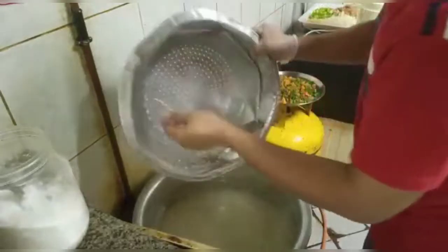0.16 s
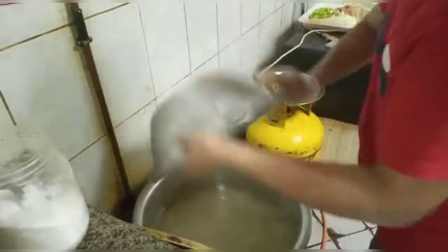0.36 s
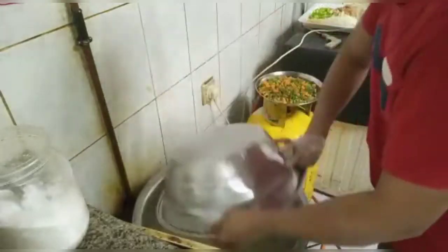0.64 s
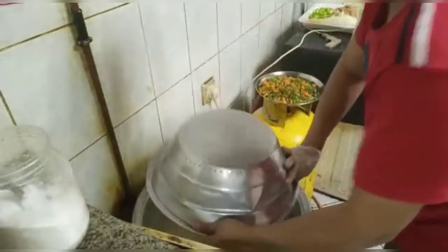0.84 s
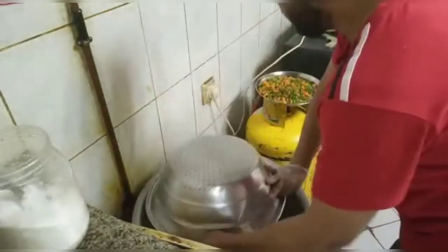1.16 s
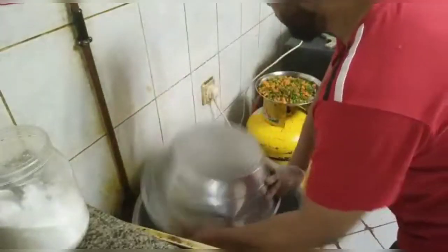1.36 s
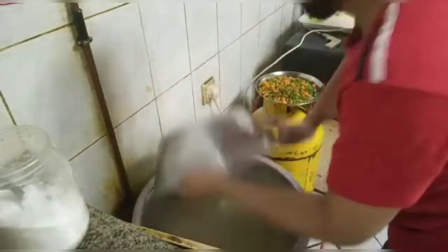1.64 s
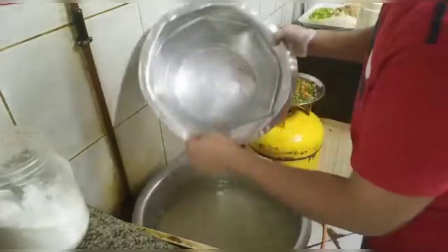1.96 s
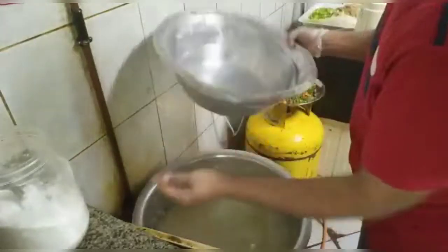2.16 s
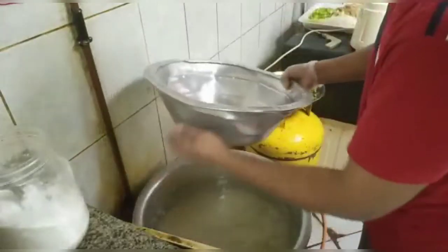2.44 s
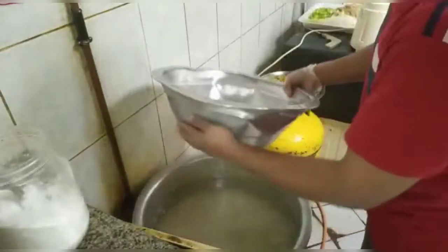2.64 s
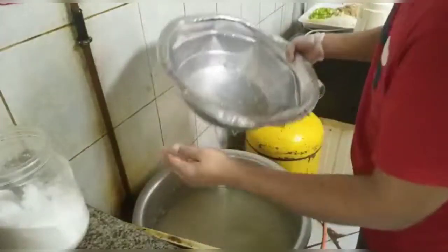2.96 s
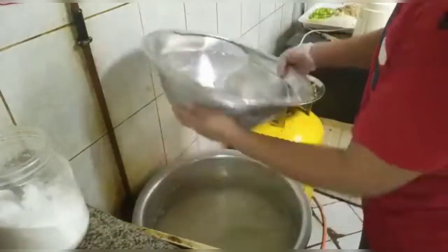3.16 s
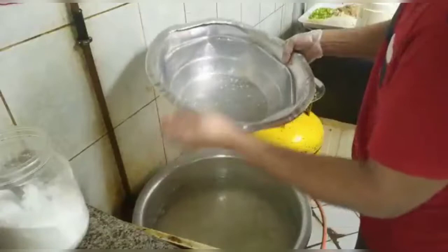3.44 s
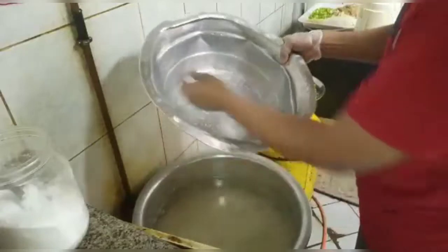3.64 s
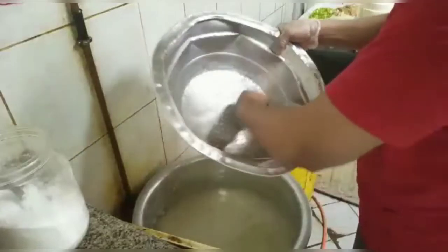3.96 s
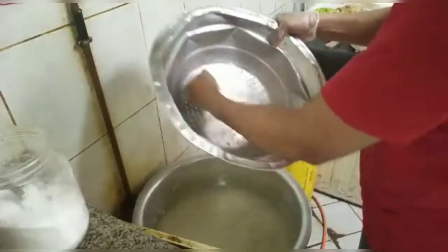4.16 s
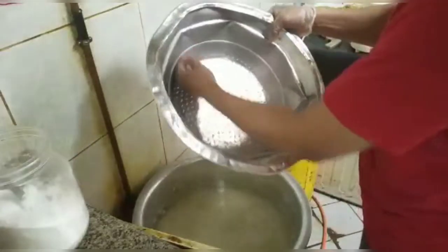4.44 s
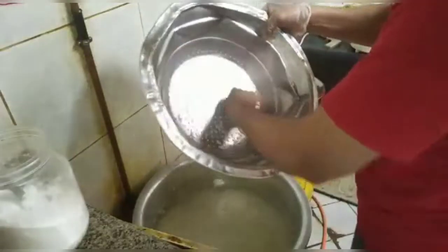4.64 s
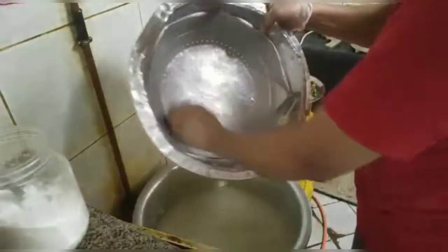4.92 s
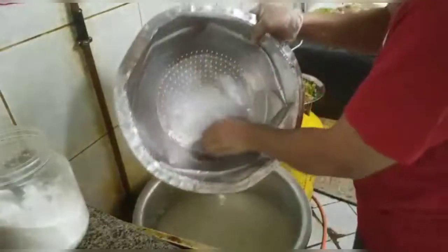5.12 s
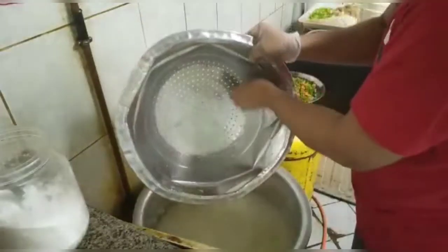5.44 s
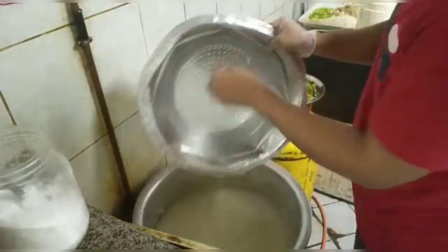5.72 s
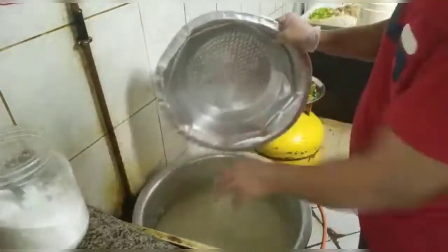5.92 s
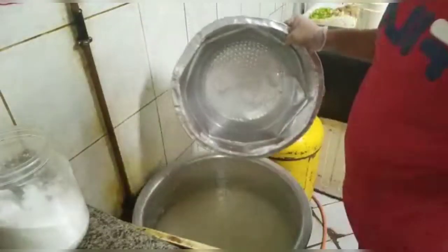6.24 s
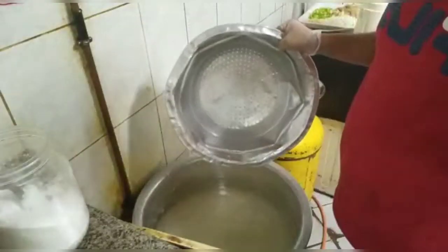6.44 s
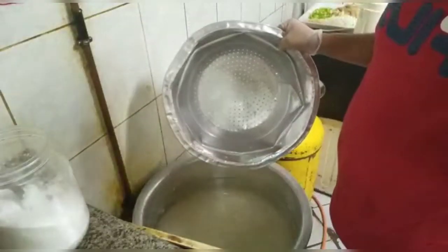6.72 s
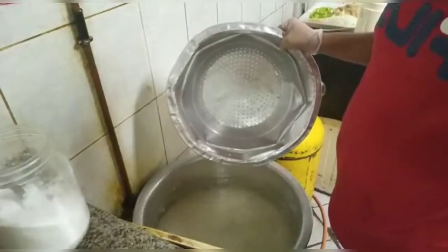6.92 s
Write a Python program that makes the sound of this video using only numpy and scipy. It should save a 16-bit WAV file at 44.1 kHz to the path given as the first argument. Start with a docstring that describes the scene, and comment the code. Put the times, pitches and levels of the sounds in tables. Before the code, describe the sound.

An extractor fan runs throughout in a small tiled kitchen, with a low hum, a faint wavering whine and rushing air. Close to the stereo microphone, a gloved hand softly wipes a thin metal strainer at the start and again around 1 second, with a couple of faint taps. At about 1.4 and 1.7 seconds the strainer is knocked on the rim of a big pot; both ring briefly, and the second clang is much louder. Three hand slaps land at about 2.6, 2.9 and 3.5 seconds, shaking the perforated sheet and rattling the loose rim, with hissy wipes between them. The blows echo briefly, and the background dips after the loud ones and creeps back. From about 3.8 to 5.3 seconds the glove rubs and lightly taps the metal. Faint wipes and a last small skid near 6.3 seconds leave only the fan until about 7 seconds.

```python
"""A small tiled kitchen, with a four-blade extractor fan humming, whining and rushing behind everything.
Close to a stereo microphone, a thin metal strainer is knocked twice on the rim of a big pot and slapped
three times by hand: strainer and pot ring, the perforated sheet shakes and the loose rim rattles.
A gloved hand wipes and taps the metal, softly before the blows and more busily after them.
The recorder's gain control ducks after loud blows and creeps back."""
import sys
import numpy as np
from scipy import signal
from scipy.fft import rfft, irfft, next_fast_len
from scipy.io import wavfile
from scipy.ndimage import uniform_filter1d, minimum_filter1d

SR = 44100
rng = np.random.default_rng(int(sys.argv[2]) if len(sys.argv) > 2 else 0)


def file_out(sig):
    """Save sig as 16-bit WAV at sys.argv[1]."""
    # one column per channel
    cols = np.atleast_2d(sig).T
    # limit, then scale
    lim = np.clip(cols, -1, 1)
    pcm = np.round(lim * 32767).astype(np.int16)
    wavfile.write(sys.argv[1], SR, pcm)


N = 312669

# finger taps: (time [s], strength [dB], extra bass [dB], pitch the struck spot favours [Hz],
# its lift [dB], rattle length [s], level of the glove's skid [dB])
FINGER_TAPS = [(0.813, -43.5, 1, 6000, 11, 0.0098, -39), (1.174, -35, -8, 577, 8.7, 0.019, -39),
               (4.055, -28.5, -15, 1500, 3.3, 0.0076, -33), (4.473, -22, 7, 540, 6.6, 0.019, -23.5),
               (4.799, -35.5, -5, 2110, 12, 0.017, -35), (5.148, -22.5, 2, 603, 4, 0.012, -28),
               (5.246, -33.5, -1, 3000, 13, 0.0096, -34), (6.26, -39, -7, 5070, 12, 0.015, -23)]


def from_db(db):
    """Gain of a dB value."""
    return 10 ** (np.asarray(db) / 20)


def unit_rms(x):
    """Scaled to rms 1."""
    return x / np.sqrt(np.mean(x ** 2) + 1e-20)


def at_hz(table, hz, column=1):
    """A column of a table read on a log-frequency axis."""
    table = np.array(table)
    return np.interp(np.log(hz), np.log(table[:, 0]), table[:, column])


def drift(rate_hz):
    """Slow random wander of rms 1."""
    pole = np.exp(-80 * np.pi * rate_hz / SR)
    slow = signal.lfilter([1], [1, -2 * pole, pole * pole], rng.standard_normal(N // 40 + 2002))[2000:]
    return np.interp(np.arange(N) / 40, np.arange(len(slow)), unit_rms(slow))


def widen(mid, side, hz):
    """Left and right from two unrelated signals, as alike as the microphone's ports hear that pitch."""
    # (frequency [Hz], left-right likeness [-1 to 1])
    likeness = [(30, 0.52), (60, 0.97), (90, 1), (150, 0.96), (300, 0.99), (600, 0.2), (1200, -0.31),
                (3000, 0.11), (12000, -0.07)]
    alike = np.clip(at_hz(likeness, hz), -1, 1)
    mid, side = np.sqrt(1 + alike) * mid, np.sqrt(1 - alike) * side
    return np.array([mid + side, mid - side]) / np.sqrt(2)


def stereo_bands(edges, noise):
    """Yields (centre in Hz, stereo band); neighbouring bands come from different noise pairs."""
    for k, (low, high) in enumerate(zip(edges, edges[1:])):
        bandpass = signal.butter(2, [low, high], "band", fs=SR, output="sos")
        hz = np.sqrt(low * high)
        yield hz, widen(*signal.sosfilt(bandpass, noise[k % 2]), hz)


def banded_noise(spectrum, noise, flicker_db):
    """Half-octave bands of stereo noise, each with its own level and flicker; rms 1."""
    bands = stereo_bands(25 * 2 ** np.arange(0, 9.6, .5), noise)
    return unit_rms(sum(from_db(at_hz(spectrum, hz) + flicker_db * drift(33)) * band for hz, band in bands))


def fan_air():
    """Rushing air, lifted at the resonances of the fan housing."""
    # air spectrum: (frequency [Hz], relative density [dB])
    spectrum = [(20, 1), (45, -22.5), (90, -1.5), (130, -15), (250, -18.5), (400, -20.5), (620, -22.5),
                (1100, -29), (1470, -23), (1900, -26.5), (3000, -25), (6700, -38.5), (8200, -24.5),
                (13000, -27.5), (20000, -31)]
    # housing resonances: (frequency [Hz], width [Hz], level [dB])
    housing = [(1094, 153, 9), (1767, 140, 4.5)]
    white = rng.standard_normal((2, 2, N))
    resonance = sum(from_db(level_db) * signal.lfilter(*signal.iirpeak(hz, hz / width_hz, SR), white)
                    for hz, width_hz, level_db in housing)
    return from_db(-33) * banded_noise(spectrum, white + resonance, flicker_db=1.0)


def fan(shaft_hz=24.24, whine_multiple=44.04):
    """Blade and motor tones that waver with turbulence, over rushing air."""
    # (multiple of the shaft rate, base level [dB], wavering [dB])
    tones = [(4, -24, 2.2), (5, -45, 3.0), (8, -38, 1.5), (11, -49, 3.0), (12, -38, 1.5), (16, -40, 1.5),
             (24, -55, 3.0), (3, -36, 3), (43, -54, 2), (44.04, -36.8, 2.6), (45, -52, 2), (46, -51, 2),
             (49, -54, 2), (54, -56, 2), (71.4, -54, 2), (72.4, -46, 2), (75.4, -57, 2), (78.3, -55, 2),
             (79.25, -51, 2)]
    # slow rise and fall in heard level, the hum's from the fan and the recorder's gain together:
    # (time [s], hum [dB], whine [dB])
    heard_levels = [(0, -3.5, -4.5), (1, -4, -7.5), (1.5, -4, -2), (2.3, -6.5, -7), (3.2, -1, -1.5),
                    (3.999, -1.5, -0.5), (4.498, -6, -0.5), (5.399, -1, -8), (5.698, -3.5, 4), (6.1, -2, 6),
                    (6.25, -2, -4.5), (6.5, -2, 5.5), (6.8, -1.5, -6), (7.09, -4, 0)]
    times, hum_db, whine_db = np.transpose(heard_levels)
    turns = np.cumsum(shaft_hz * (1 + 0.00076 * drift(1.2))) / SR
    out = fan_air()
    for multiple, level_db, waver_db in tones:
        phase = 2 * np.pi * (multiple * turns + rng.random())
        heard_db = np.interp(np.arange(N) / SR, times, whine_db if multiple == whine_multiple else hum_db)
        gain = np.sqrt(2) * from_db(level_db + heard_db + waver_db * np.minimum(drift(7.7), 1))
        out += gain * widen(np.sin(phase), np.cos(phase), multiple * shaft_hz)
    return out


def kitchen_echoes(x, t60_s=0.51, wall_cut_hz=4630):
    """Eight echo paths a side between tiled walls, duller on every round."""
    size = next_fast_len(N + SR)
    omega = 2 * np.pi * np.arange(size // 2 + 1) / size
    dull = 1 / (1 + 1j * omega * SR / (2 * np.pi * wall_cut_hz))
    echoes = np.zeros((2, len(omega)), complex)
    for k, lag in enumerate(rng.uniform(.009, .034, 16) * SR):
        loop = from_db(-60 * lag / SR / t60_s) * dull * np.exp(-1j * omega * lag)
        echoes[k % 2] += (-1) ** (k // 2) * loop / (1 - loop)
    return irfft(rfft(x, size) * echoes, size)[:, :N]


def dense_modes(length, peaky_db=3.5, peak_width_hz=50):
    """Two pairs of noises for the sheet's dense modes, bunched into narrow peaks at chance pitches."""
    spectrum = rfft(rng.standard_normal((2, 2, length)))
    width = max(int(peak_width_hz * length / SR), 1)
    peaks = uniform_filter1d(uniform_filter1d(rng.standard_normal(spectrum.shape[-1]), width), width)
    return irfft(spectrum * from_db(peaky_db * np.minimum(unit_rms(peaks), 1.6)), length)


def wiping(skid_held_s=0.014, skid_fade_s=0.079):
    """Dense slips of the glove over the holes, louder with pressure."""
    # (time of full pressure [s], 20 dB rise [s], hold [s], level [dB], 20 dB fade [s]);
    # rise and fade have lower limits, set below
    strokes = [(0.095, 0.06, 0.011, -22.5, -0.01), (0.148, .03, 0.011, -24.5, 0.04),
               (0.227, 0.22, 0.046, -21, 0.08), (0.299, -0.1, 0.03, -29, 0.15), (.97, 0.22, 0.11, -32, 0.9),
               (1.08, 0.11, 0.033, -25, 0.06), (2.79, -0.12, .08, -16.5, 0.34),
               (3.078, -0.2, 0.11, -16.5, 0.17), (3.778, -0.02, 0.022, -16, 0.16),
               (4.148, -0.14, 0.093, -30, -0.5), (4.33, 0.33, 0.014, -28.5, 0.23),
               (4.58, -0.9, 0.09, -35, 0.14), (4.891, 0.14, 0.054, -33, 0.38),
               (5.041, 0.2, 0.019, -32, 0.7), (5.66, 0.2, 0.11, -36, 0.2), (5.931, 0.4, 0.011, -38, 0.4)]
    # glove on metal: (frequency [Hz], relative density [dB])
    spectrum = [(240, -70), (400, -4.5), (694, -13), (1090, -6.5), (1280, -6.5), (6220, -6.5), (7620, -2.5),
                (12800, 0.5), (16700, -19), (22000, -120)]
    t = np.arange(N) / SR
    skids = [(tap[0], 0, skid_held_s, tap[-1], skid_fade_s) for tap in FINGER_TAPS]
    pressure = from_db(-50) * (t > 2.7)  # from here the glove rests on the metal and rustles faintly
    for full_s, rise_s, held_s, level_db, fade_s in strokes + skids:
        rise_db = 20 * np.maximum(full_s - t, 0) / max(rise_s, .002)
        fade_db = 20 * np.maximum(t - full_s - held_s, 0) / max(fade_s, .04)
        pressure += from_db(level_db - rise_db - fade_db)
    slips = dense_modes(next_fast_len(N))[..., :N] * from_db(1.4 * drift(46.0))
    return uniform_filter1d(pressure, size=120) * banded_noise(spectrum, slips, flicker_db=0.95)


def excited_db(kind, bass_db, spot_hz, lift_db, hz, bass_edge_hz=188, spot_octaves=0.17):
    """What a blow puts into each pitch: contact colour, weight in the bass, a lift at the spot's pitch."""
    # contact colours: (frequency [Hz], rim [dB], palm [dB], fingers [dB])
    contact = [(75, -27.5, -25.5, -32), (141, -27, -24, -25.5), (234, -8, -27, -40),
               (382, -17.5, -16.5, -17), (564, -15, -17, -11.5), (810, -16, -15.5, -10),
               (1150, -14.5, -13, -11), (1500, -16, -15, -9), (2700, -16, -13.5, -14),
               (6000, -14.5, -10.5, -10.5)]
    weight_db = bass_db / (1 + (hz / bass_edge_hz) ** 4)
    spot_db = lift_db * np.exp(-.5 * (np.log2(hz / spot_hz) / spot_octaves) ** 2)
    return at_hz(contact, hz, column=kind + 1) + weight_db + spot_db


def strainer(crack_db=8, crack_s=0.0084):
    """Each blow shakes the clear modes and the dense sheet; the loose rim feeds them while it rattles."""
    # clear modes of strainer and pot: (frequency [Hz], level [dB], free t60 [s])
    modes = [(77, 7, 1.0), (60, -6, .5), (135, -4, .3), (212, -2, .3), (240, -9, .3), (275, -1, .35),
             (293, -7, .35), (447, -8, .35), (482, -9, .35), (511, -6, .4), (562, -9, .3), (600, -8, .35),
             (625, -10, .3), (735, -5, .4), (790, -8, .3), (855, -4, .35), (1106, -6, .4), (1175, -2, .4),
             (1215, -6, .35), (1310, -7, .35), (1669, -9, .35), (1981, -8, .3), (2151, -11, .3),
             (2560, -11, .3), (2762, -8, .35), (2936, -9, .35), (3186, -11, .3)]
    # dense modes of the perforated sheet: (frequency [Hz], band level [dB], free t60 [s])
    sheet = [(35, -7, 0.31), (111, 7, 0.36), (290, -4, 0.38), (556, -1.5, 0.54), (1210, 2.5, 0.44),
             (1480, 1, 0.59), (2540, -0.5, 0.56), (4550, -6, 0.54), (6530, -2.5, 0.54), (8700, 0.5, 0.48),
             (13000, 3.5, 0.45)]
    # blows on the pot's rim and by the palm: columns as in FINGER_TAPS, without the skid
    rim_knocks = [(1.382, -2.5, 2, 1150, 3.5, 0.073), (1.712, 10.5, 1, 2700, 2.5, 0.037)]
    slaps = [(2.631, 4.7, -1, 2750, 5.8, 0.035), (2.937, 6.7, 4.5, 523, 6.9, 0.015),
             (3.506, 4.7, 5.5, 329, 9, 0.041)]
    # share of the free ring time that the damping hand leaves: (rim, palm, fingers)
    ring_share = [0.81, 0.87, 0.76]
    length = int(.7 * SR)
    t = np.arange(length) / SR
    hz, level_db, t60 = np.transpose(modes)
    band_hz, bands = zip(*stereo_bands(28 * 2 ** np.arange(0, 9.2, .4), dense_modes(2 * length)))
    band_hz, bands = np.array(band_hz), [unit_rms(band) for band in bands]
    band_t60 = at_hz(sheet, band_hz, column=2)
    build_up = 1 - np.exp(-t * hz[:, None] / 1.1)  # low modes take longer to build up
    treble_crack = from_db(crack_db) * np.exp(-t / crack_s) * np.minimum(band_hz / 5000, 1)[:, None]
    rim_chatter = from_db(1.45 * drift(32.0))
    blows = [(kind, *row[:6]) for kind, rows in enumerate((rim_knocks, slaps, FINGER_TAPS)) for row in rows]
    chance = rng.random((len(blows), 3, len(hz)))
    out = np.zeros((2, N + length))
    for (kind, start_s, blow_db, *colour, rattle_s), (strength, phase, skew) in zip(blows, chance):
        decay = -np.log(1000) * np.maximum(t - rattle_s, 0) / ring_share[kind]
        gain = from_db(blow_db + level_db + excited_db(kind, *colour, hz) + 3.8 * strength)
        rings = build_up * np.exp(2j * np.pi * hz[:, None] * t + decay / t60[:, None])
        mid = np.exp(2j * np.pi * phase)
        side = mid * np.exp(2j * np.pi * skew)
        sound = (gain * widen(mid, side, hz) @ rings).imag
        band_gain = from_db(blow_db + at_hz(sheet, band_hz) + excited_db(kind, *colour, band_hz))
        shake = band_gain[:, None] * (np.exp(decay / band_t60[:, None]) + treble_crack)
        offset = int(phase[0] * length)
        stretch = slice(offset, offset + length)  # each blow has its own stretch of noise
        shake *= (1 - np.exp(-t / 0.00078)) * rim_chatter[stretch]
        sound += sum(band[:, stretch] * envelope for band, envelope in zip(bands, shake))
        out[:, round(start_s * SR):][:, :length] += sound
    return out[:, :N]


def scene():
    """Strainer and hand close to the microphone; the walls answer the blows and the fan runs behind."""
    metal = strainer()
    return metal + from_db(-21) * kitchen_echoes(metal) + wiping() + fan()


def gain_control(x, threshold_db=-18, share=0.71, attack_s=0.076, recover_db_per_s=6):
    """The recorder ducks by a share of the level above its threshold, then creeps back."""
    hop = 128
    power = uniform_filter1d(np.mean(x ** 2, axis=0), size=1024)[::hop]
    wanted_db = share * np.maximum(10 * np.log10(power + 1e-12) - threshold_db, 0)
    duck_db, now_db = np.zeros(len(wanted_db)), 0.
    for i, want_db in enumerate(wanted_db):
        gap_db = want_db - now_db
        now_db += gap_db * hop / SR / attack_s if gap_db > 0 else max(gap_db, -recover_db_per_s * hop / SR)
        duck_db[i] = now_db
    return x * from_db(-np.interp(np.arange(N), np.arange(len(duck_db)) * hop, duck_db))


def record(dry, shelf_hz=6930, shelf_db=-15.5, stop_hz=13300):
    """A microphone weak in deep bass and high treble, then gain control, limiter, clipping and top cut."""
    x = signal.sosfilt(signal.butter(2, 40, "high", fs=SR, output="sos"), dry)
    below = signal.sosfiltfilt(signal.butter(12, shelf_hz, fs=SR, output="sos"), x)
    x = below + from_db(shelf_db) * (x - below)
    x = gain_control(x * from_db([[0.2], [-0.2]]))  # the left port hears a little more
    limiter_gain = minimum_filter1d(1.471 / np.maximum(np.abs(x).max(axis=0), 1.3), size=400)
    x = np.clip(x * uniform_filter1d(limiter_gain, size=200), -1, 1)
    top_cut = signal.cheby2(12, 50, stop_hz, fs=SR, output="sos")
    return np.clip(signal.sosfilt(top_cut, x), -1, 1)


dry = scene()
out = record(dry)
file_out(out)
```